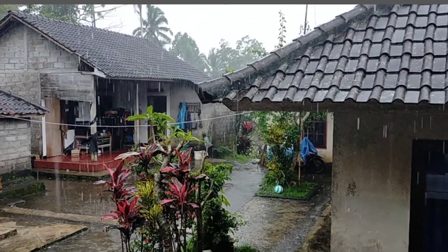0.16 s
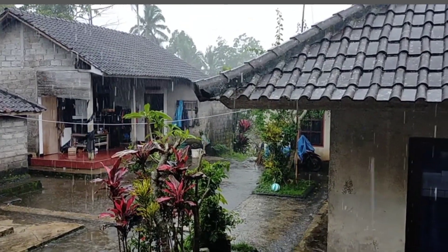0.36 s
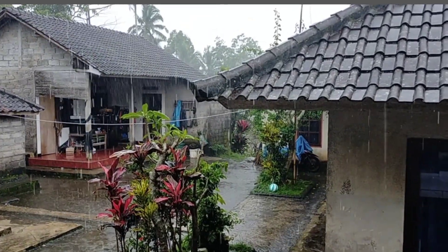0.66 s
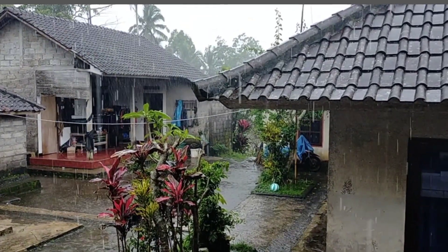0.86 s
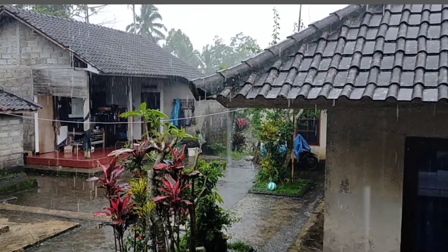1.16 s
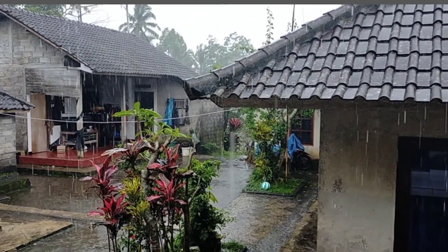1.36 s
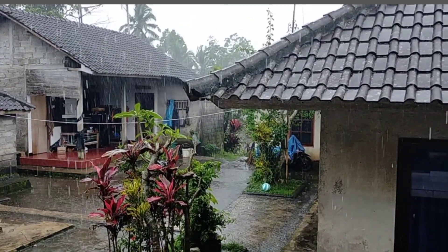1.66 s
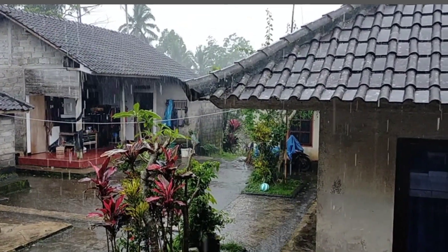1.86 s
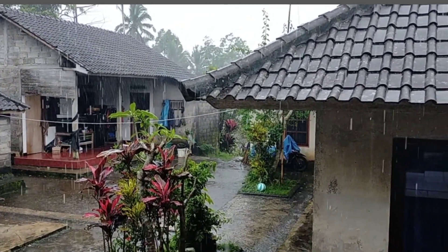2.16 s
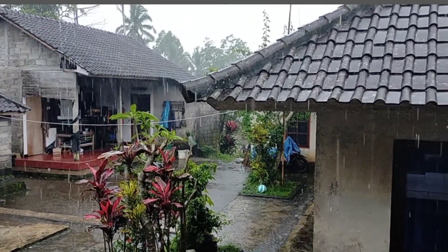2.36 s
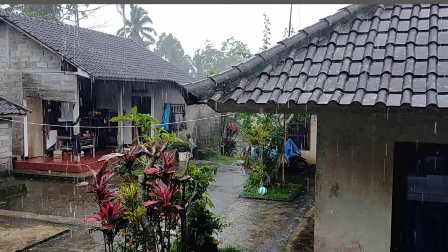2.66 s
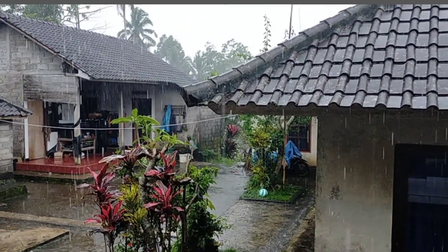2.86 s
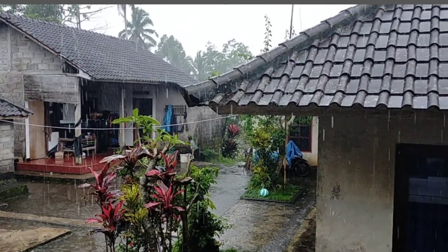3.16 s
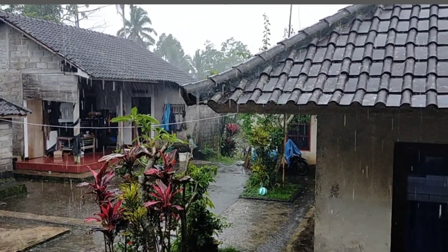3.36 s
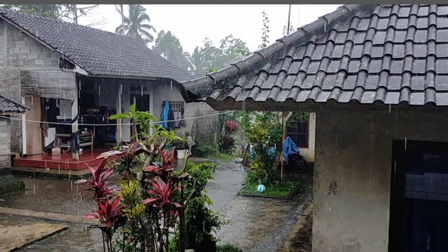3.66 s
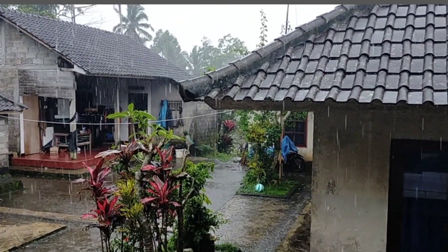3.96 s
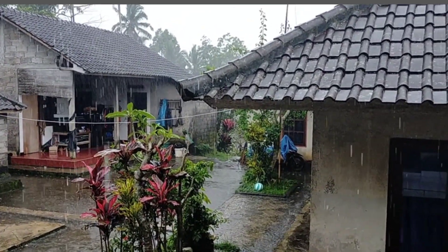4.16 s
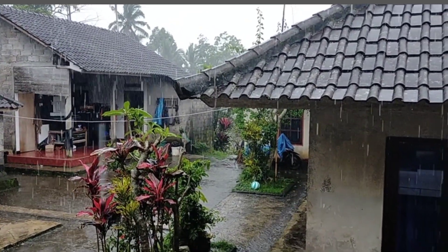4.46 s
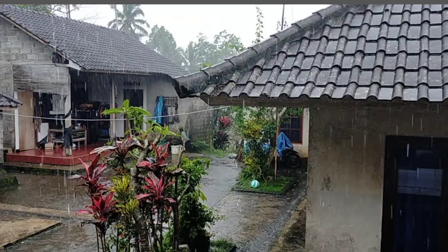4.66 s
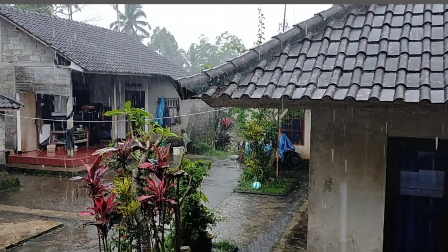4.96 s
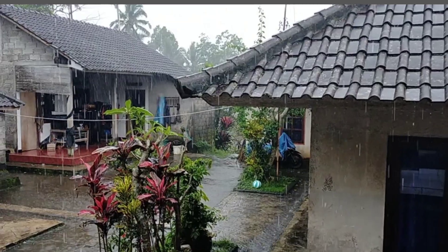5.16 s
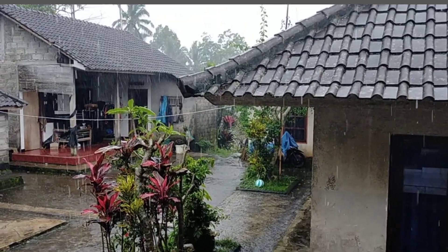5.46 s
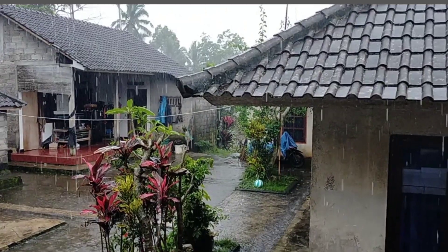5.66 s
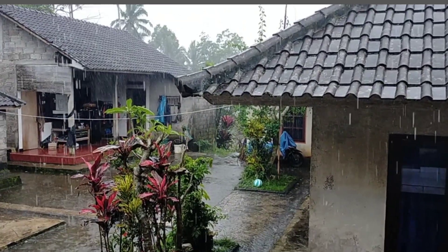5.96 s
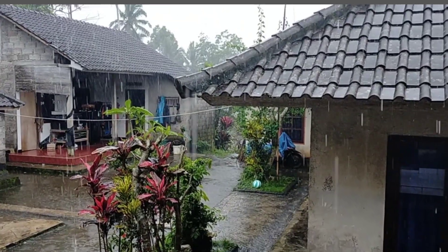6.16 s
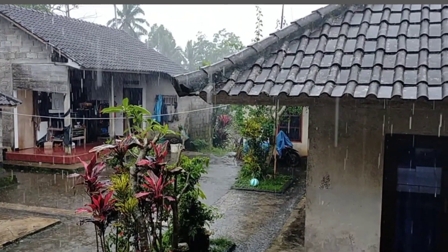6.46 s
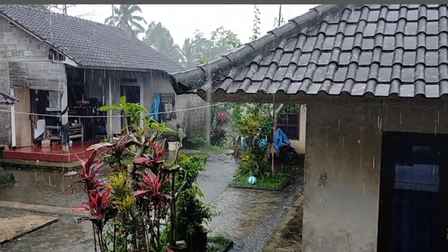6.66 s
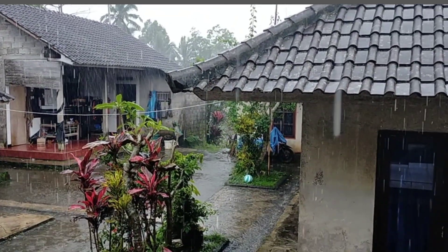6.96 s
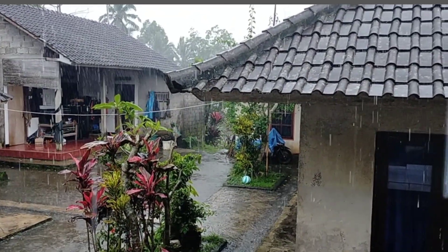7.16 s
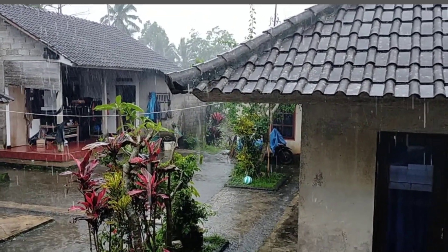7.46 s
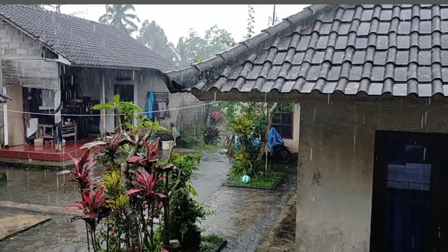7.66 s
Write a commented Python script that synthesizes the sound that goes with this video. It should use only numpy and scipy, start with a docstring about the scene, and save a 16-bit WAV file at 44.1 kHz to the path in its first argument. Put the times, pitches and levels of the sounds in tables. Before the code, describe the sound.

Heavy rain falls for the whole eight seconds on tiled roofs and a wet concrete yard, heard nearly in mono from under an eave. It is a dense, even wash with a bright, fine splashing from the ground and puddles, slightly stronger in the first second. Fat drips from the roof edge smack down close by at irregular moments, about three a second, standing out near 0.6, 3.5 and 5.7 seconds. Heavy drops give occasional short hollow knocks, clearest at about 3 seconds, with others near 0.3, 1.7, 4.1 and 5.7. Faint, thin metallic tinks occur mostly in the first three seconds. Light wind rumbles on the microphone, swelling at the start, between 1 and 1.6 seconds, and near 2.9 and 7.3. The rain and wind dip for an instant several times, most noticeably around 1.5, 5.2 and 6 seconds.

```python
"""Heavy rain from under an eave

A nearly mono microphone stands under an eave, facing tiled roofs and a wet concrete yard.
Countless drops ring the tiles and merge into a wash farther off. Nearer ones splash on the ground
and trap bubbles in puddles; close by, fat drips smack down from the roof edge, and others knock or tink.
A light wind rumbles on the microphone, and a few times the level of rain and wind dips briefly."""
import sys
import numpy as np
from scipy import signal
from scipy.fft import rfft, irfft, next_fast_len
from scipy.io import wavfile
from scipy.ndimage import uniform_filter1d

SR = 44100
rng = np.random.default_rng(int(sys.argv[2]) if len(sys.argv) > 2 else 0)


def unload_wav(signal):
    """Save mono or channel-first audio to the path in sys.argv[1] as 16-bit WAV at rate SR, clipped to [-1, 1]."""
    wavfile.write(
        sys.argv[1],
        SR,
        np.round(np.clip(np.atleast_2d(signal).T, -1, 1) * 32767).astype(np.int16),
    )


N = 344421

# strength of the downpour, as the roar of the roofs: time_s, level_db
DOWNPOUR = [(0.0, -16.5), (0.24, -16), (0.45, -16.5), (0.7, -15.2), (1.05, -17.5), (1.55, -17),
            (1.85, -18.5), (2.8, -18.5), (3.0, -17.5), (4.0, -16.5), (4.7, -17), (5.05, -17), (5.38, -17),
            (5.55, -18.9), (5.93, -17.0), (6.15, -18.0), (6.75, -17.9), (7.3, -17)]
# tone of the roofs, the yard and the wind on the microphone: frequency_hz, relative_db
ROOF_SPECTRUM = [(90, -23.5), (150, -6.5), (210, -8), (310, -6), (400, -11), (520, -9), (750, -7.5),
                 (1050, -6), (1400, -2), (1800, -1.5), (2300, -2), (3000, -6), (3900, -14), (5200, -26),
                 (15000, -50)]
YARD_SPECTRUM = [(600, -27), (2000, -7), (3700, -2.5), (5200, -6.5), (6300, -4.5), (7400, -2), (8300, 2.5),
                 (9300, -3), (11000, -3), (13500, -2)]
WIND_SPECTRUM = [(10, -4), (25, -5), (45, -1), (65, -5.5), (85, -2), (108, -7.5), (145, 1.5), (180, -10.5),
                 (230, -13.5), (500, -26.5)]
# gusts on the microphone: crest_s, level_db
GUSTS = [(0.03, -21), (0.35, -30), (1.12, -22.5), (1.6, -24.5), (2.58, -30), (2.86, -25), (5.0, -32),
         (7.32, -26.5)]
# the fattest drips, on wet concrete close by: start_s, peak_db, pitch_hz, spray_fade_s
EAVE_DRIPS = [(0.2318, -7, 7100, 0.024), (0.6276, -2, 14800, 0.025), (0.702, -9, 8400, .012),
              (0.9175, -6, 6500, .002), (1.2037, -6, 7100, .003), (1.6239, -7, 15000, .002),
              (1.7246, -4.5, 10700, .001), (2.2455, -5, 8500, .005), (3.0299, -5, 14500, .005),
              (3.317, -4, 15000, .004), (3.503, -3, 14500, 0.016), (3.515, -6, 8000, 0.023),
              (3.7482, -6, 14900, .003), (3.9276, -8, 5000, .005), (4.291, -12, 4900, .005),
              (4.4152, -5.5, 8800, .002), (4.9745, -7, 7200, .003), (5.4221, -6, 13200, .006),
              (5.4596, -5, 15000, 0.0037), (5.7497, -2, 14900, 0.011), (5.921, -8, 6950, .002),
              (6.0268, -6, 15000, .004), (6.3276, -7, 14200, .002), (6.4084, -12, 6200, .002),
              (6.602, -5, 14600, .002), (7.4373, -9, 6200, .005), (7.6346, -9, 6200, .005)]
# heavy drops knocking hollowly: start_s, level_db, pitch_hz
KNOCKS = [(0.312, -6, 1670), (1.375, -8, 1800), (1.677, -6, 1940), (3.038, -1.5, 1520), (4.135, -6.5, 1450),
          (4.142, -5.5, 1660), (5.368, -11, 1890), (5.66, -6.5, 1700), (6.965, -8, 1440),
          (7.205, -10, 1800)]
# drips with a thin ring, plus two short bubble plinks near 4.5 kHz: start_s, level_db, pitch_hz, fade_s
TINKS = [(0.40, -30, 5325, .03), (0.665, -22, 5300, .025), (0.925, -30, 5325, .025),
         (0.935, -23, 9225, .03), (0.962, -31, 5325, .025), (1.185, -22, 7100, .025),
         (1.625, -30, 5325, .03), (1.672, -21, 4520, .008), (2.205, -23, 4420, .01),
         (3.021, -27, 5350, .03), (5.84, -26, 8620, .03)]
# brief dips in the level of rain and wind: start_s, end_s, depth_db
LEVEL_DIPS = [(0.945, 1.04, 1.5), (1.43, 1.535, 9.3), (4.343, 4.447, 4.5), (5.114, 5.265, 5.5),
              (5.159, 5.265, 6), (5.791, 5.865, 2.5), (5.913, 6.012, 8), (6.323, 6.411, 6),
              (6.594, 6.697, 4)]
# very faint left-right hiss around 2 kHz, mono above 3 kHz: frequency_hz, relative_db
SIDE_HISS_SPECTRUM = [(150, 2), (450, 0), (1000, -2), (1800, 11), (2400, 8.5), (2900, -61), (3400, -60),
                      (4000, -83)]
# slight lean to the right: frequency_hz, left_minus_right_db
BALANCE = [(400, -1.2), (1100, -.45), (2200, -.7), (2750, 0)]
# the microphone rings near the top of its range: frequency_hz, gain_db
MICROPHONE_RESPONSE = [(12500, 0), (13800, 1), (14600, 3.5), (15100, 6.5), (15400, 8.5)]


def from_db(db):
    return 10 ** (np.asarray(db) / 20)


def unit_rms(x):
    return x / np.sqrt(np.mean(x ** 2) + 1e-20)


def coloured(x, spectrum):
    """A causal (minimum-phase) filter with the given spectrum."""
    size = 2 * next_fast_len(N // 2 + SR // 10)
    hz, level_db = np.transpose(spectrum)
    grid_hz = np.maximum(np.arange(size // 2 + 1) * SR / size, 1)
    magnitude = from_db(np.interp(np.log(grid_hz), np.log(hz), level_db))
    cepstrum = irfft(np.log(magnitude))
    cepstrum[1:size // 2] *= 2
    cepstrum[size // 2 + 1:] = 0
    return irfft(rfft(x, size) * np.exp(rfft(cepstrum)), size)[..., :N]


def drops(per_s, spread_db):
    """Impacts at random moments: many small, a few large."""
    sizes = from_db(spread_db * np.minimum(rng.exponential(1, N), 4))
    return sizes * (rng.random(N) < per_s / SR)


def random_signs(x):
    return x * rng.choice([-1, 1], N)


def fading(x, fade_s):
    """Each impulse dies away exponentially."""
    return signal.lfilter([1], [1, -np.exp(-1 / (fade_s * SR))], x + 1e-18)


def ring(clicks, hz, t60_s):
    """A unit click sets a sine of height 1 ringing."""
    radius, angle = from_db(-60 / (t60_s * SR)), 2 * np.pi * hz / SR
    return signal.lfilter([0, np.sin(angle)], [1, -2 * radius * np.cos(angle), radius ** 2], clicks + 1e-18)


def broad_ring(clicks, hz, width_hz):
    """A resonance set by its bandwidth: the wider, the shorter."""
    return ring(clicks, hz, t60_s=np.log(1000) / (np.pi * width_hz))


def add(out, start_s, sound):
    """Mixes a short sound in at start_s."""
    at = max(round(start_s * SR), 0)
    out[at:at + len(sound)] += sound[:max(N - at, 0)]


def downpour_db(surge_db, surge_s):
    """The strength of the rain, swinging slightly at random as it comes in sheets."""
    trend_db = np.interp(np.arange(N) / SR, *np.transpose(DOWNPOUR))
    width = round(surge_s * SR)
    sheets = uniform_filter1d(uniform_filter1d(rng.standard_normal(N), width), width)
    return trend_db + surge_db * unit_rms(sheets)


def roofs(per_s, spread_db, tile_t60_s, far_db, count=24):
    """Every drop rings one clay tile briefly; the far roofs merge into a smooth wash."""
    near = sum(ring(random_signs(drops(per_s / count, spread_db)), hz, tile_t60_s)
               for hz in np.linspace(600, 4200, count))
    far = from_db(far_db) * rng.standard_normal(N)
    return unit_rms(coloured(unit_rms(near) + far, ROOF_SPECTRUM))


def yard(per_s, spread_db, spray_s, tick_db, far_db):
    """A drop gives a tick and a puff of spray; run-off from the eaves throws showers of droplets."""
    showers = fading(drops(per_s=45, spread_db=3.5) ** 2, fade_s=0.011)
    hits = drops(per_s * (1 + showers / showers.mean()) / 2, spread_db)   # half steady, half in showers
    ticks = from_db(tick_db) * unit_rms(random_signs(hits))
    spray = unit_rms(np.sqrt(fading(hits ** 2, spray_s)) * rng.standard_normal(N))
    far = from_db(far_db) * rng.standard_normal(N)
    return unit_rms(coloured(ticks + spray + far, YARD_SPECTRUM))


def puddles(per_s, spread_db, t60_s, count=30):
    """Tiny trapped bubbles ring for a moment, each at the pitch of its size."""
    bubbles = sum(ring(drops(per_s / count, spread_db), hz, t60_s)
                  for hz in np.linspace(3500, 15400, count))
    return unit_rms(coloured(bubbles, YARD_SPECTRUM))


def small_drips(per_s, spread_db, fade_s, width_hz, count=8):
    """Lesser drips land at random along the eaves, each a short smack with a broad pitch."""
    smacks = np.zeros(N)
    for hz in np.linspace(6000, 15000, count):
        impacts = fading(drops(per_s / count, spread_db), fade_s) * rng.standard_normal(N)
        smacks += broad_ring(impacts, hz, width_hz)
    return unit_rms(coloured(smacks, YARD_SPECTRUM))


def wind(breeze_db, rise_s, fall_s):
    """Rumble on the microphone: a faint breeze, with gusts that swell fast and die slowly."""
    t = np.arange(N) / SR
    power = from_db(breeze_db) ** 2
    for crest_s, level_db in GUSTS:
        gust = from_db(level_db) * np.exp(-np.maximum((crest_s - t) / rise_s, (t - crest_s) / fall_s))
        power = power + gust ** 2
    return np.sqrt(power) * unit_rms(coloured(rng.standard_normal(N), WIND_SPECTRUM))


def eave_drips(smack_s, width_hz, splat_db, spray_db):
    """Close to the microphone: a sharp splat with a broad pitch, then droplets falling back."""
    smacks, showers = np.zeros(N), np.zeros(N)
    t = np.arange(SR // 10) / SR
    low_cut = signal.butter(2, 4000, "high", fs=SR, output="sos")   # a water film radiates little bass
    for start_s, peak_db, hz, spray_fade_s in EAVE_DRIPS:
        impact = signal.sosfilt(low_cut, rng.standard_normal(len(t)) * np.exp(-t / smack_s))
        smack = unit_rms(broad_ring(impact, hz, width_hz)) + from_db(splat_db) * unit_rms(impact)
        add(smacks, start_s, from_db(peak_db) * smack / np.abs(smack).max())
        add(showers, start_s, from_db(peak_db + spray_db) * np.exp(-t / spray_fade_s))
    droplets = unit_rms(random_signs(drops(per_s=8000, spread_db=3)))
    return smacks + coloured(showers * droplets, YARD_SPECTRUM)


def knocks(rise_s, scatter_db, scatter_s):
    """A heavy drop gives a short hollow ring, scattered by the walls of the yard."""
    out, t = np.zeros(N), np.arange(SR // 10) / SR
    envelope = t / rise_s * np.exp(1 - t / rise_s)
    for start_s, level_db, hz in KNOCKS:
        knock = np.sin(2 * np.pi * hz * t) * envelope
        walls = from_db(scatter_db) * rng.standard_normal(len(t)) * np.exp(-t / scatter_s)
        echoes = signal.fftconvolve(knock, walls)[:len(t)]
        add(out, start_s, from_db(level_db) * (knock + echoes))
    return out


def tinks():
    """Some drips give a faint, thin metallic ring, and a couple of bubbles plink near 4.5 kHz: one dying sine
    each."""
    out, t = np.zeros(N), np.arange(SR // 4) / SR
    for start_s, level_db, hz, fade_s in TINKS:
        add(out, start_s, from_db(level_db) * np.sin(2 * np.pi * hz * t) * np.exp(-t / fade_s))
    return out


def level_dips(sink_s, return_s):
    """A gain that sinks quickly, holds and snaps back."""
    gain_db, t = np.zeros(N), np.arange(N) / SR
    for start_s, end_s, depth_db in LEVEL_DIPS:
        ramps = np.minimum((t - start_s) / sink_s, (end_s - t) / return_s)
        gain_db -= depth_db * np.clip(ramps + 0.5, 0, 1)
    return from_db(gain_db)


def scene():
    """One downpour drives roofs and yard; they dip with the wind, while the nearest drips stay on top."""
    rain_db = downpour_db(surge_db=0.5, surge_s=0.075)
    roar = from_db(rain_db) * roofs(per_s=4500, spread_db=2.5, tile_t60_s=0.016, far_db=9)
    splash = yard(per_s=3000, spread_db=1.5, spray_s=0.0015, tick_db=-2, far_db=4)
    bubbles = from_db(-10) * puddles(per_s=600, spread_db=2, t60_s=0.0075)
    patter = from_db(-14) * small_drips(per_s=10, spread_db=1, fade_s=0.0017, width_hz=2000)
    ground = from_db(rain_db - 3.5) * (splash + bubbles + patter)
    drips = eave_drips(smack_s=0.0012, width_hz=1500, splat_db=-6, spray_db=-9)
    rumble = wind(breeze_db=-37, rise_s=0.18, fall_s=0.38)
    knocking = knocks(rise_s=0.00054, scatter_db=-24.5, scatter_s=0.022)
    gain = level_dips(sink_s=0.006, return_s=0.004)
    mid = gain * (roar + ground + rumble) + drips + knocking + tinks()
    side_hiss = unit_rms(coloured(rng.standard_normal(N), SIDE_HISS_SPECTRUM))
    side = gain * from_db(rain_db - 30) * side_hiss   # so faint that the image stays nearly mono
    left = coloured(mid, [(hz, db / 2) for hz, db in BALANCE])
    right = coloured(mid, [(hz, -db / 2) for hz, db in BALANCE])
    return np.array([left + side, right - side])


def record(dry):
    """The microphone brightens the treble, the tallest peaks clip, and the very top is cut steeply."""
    clipped = np.clip(coloured(dry, MICROPHONE_RESPONSE), -0.92, 0.92)
    high_cut = signal.ellip(14, 0.1, 90, 15470, fs=SR, output="sos")
    return signal.sosfilt(high_cut, clipped)


dry = scene()
out = record(dry)
unload_wav(out)
```